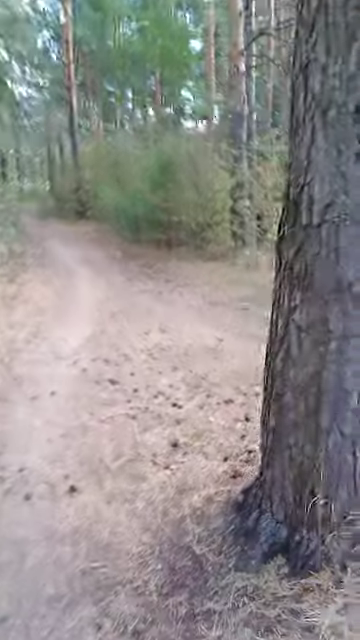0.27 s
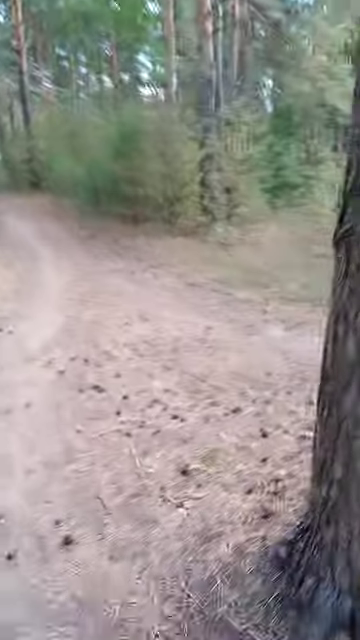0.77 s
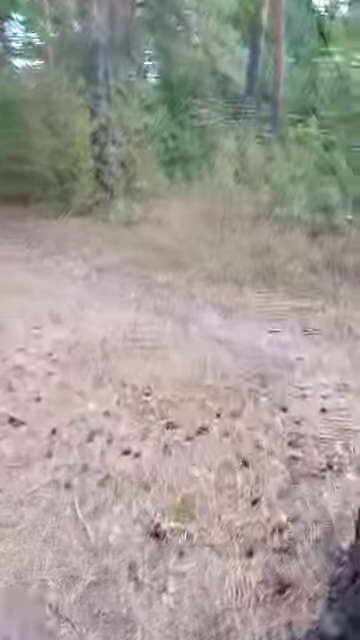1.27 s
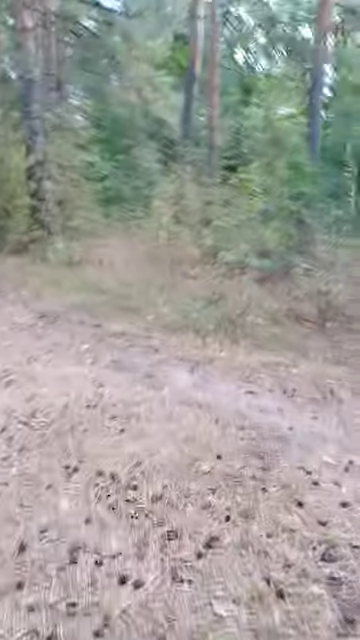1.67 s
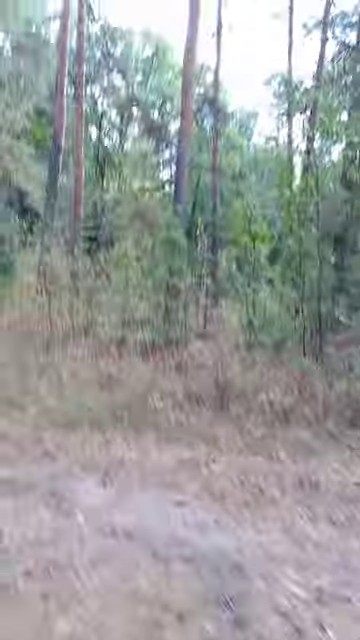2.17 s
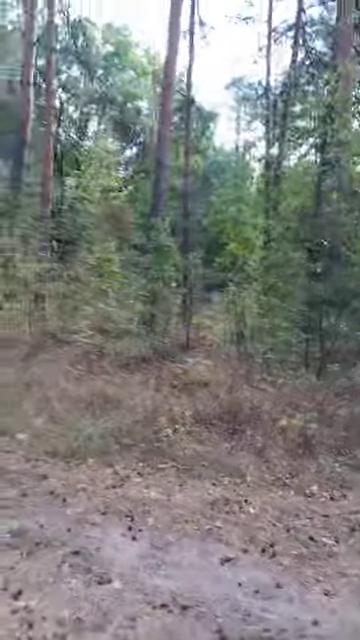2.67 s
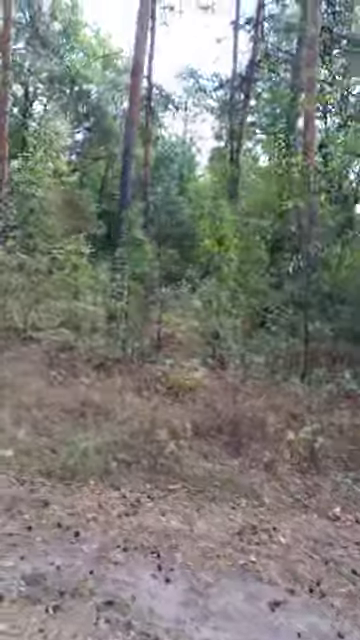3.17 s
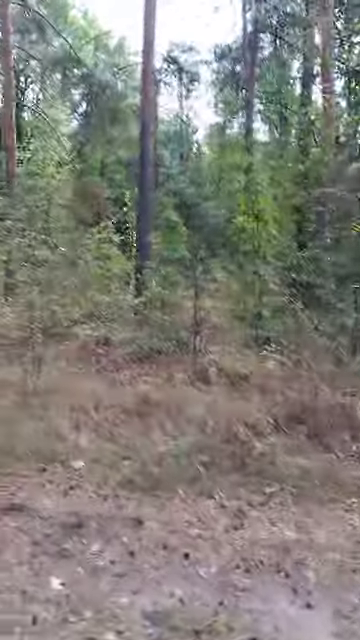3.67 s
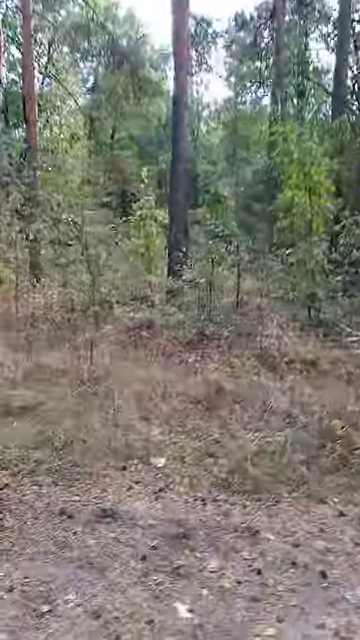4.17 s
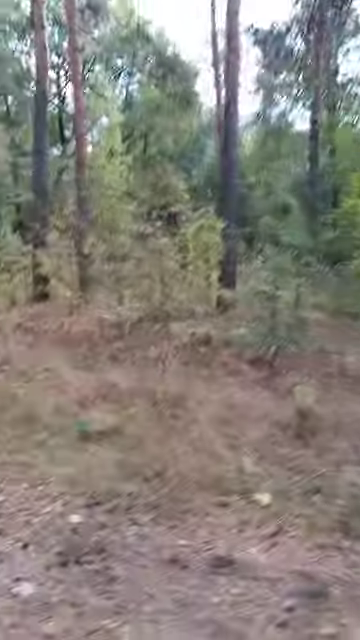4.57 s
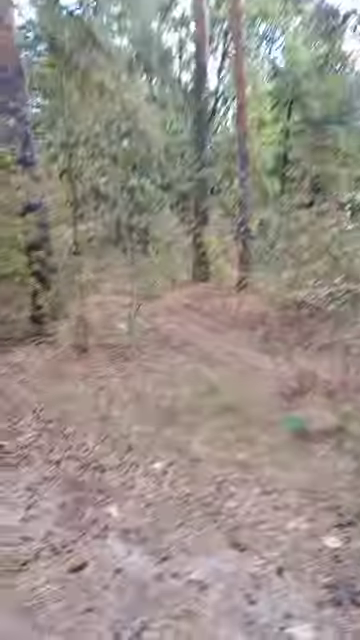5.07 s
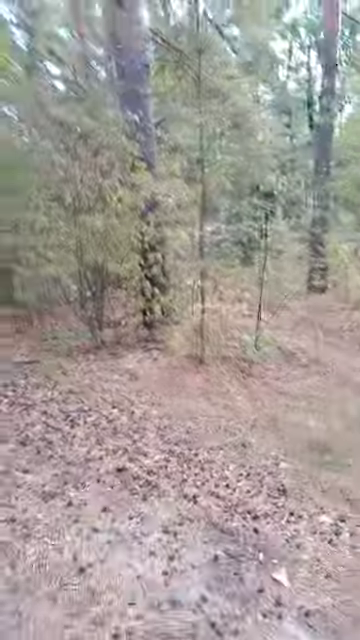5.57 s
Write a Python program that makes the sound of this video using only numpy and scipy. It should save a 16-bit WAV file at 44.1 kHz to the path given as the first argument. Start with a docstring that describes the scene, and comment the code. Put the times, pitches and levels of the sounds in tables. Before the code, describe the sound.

Faint tyre rustle on leaves and dirt under wind rumble, broken by loud finger pops and case knocks on the left of a handheld microphone.

```python
"""Something moves through leaf litter, as in footsteps or dragging: rustle, grind, a low hum and crunching twigs.
The microphone is a handheld stereo recorder with a left and a right port; wind rumbles in both.
A finger keeps touching the left port: sharp pops, knocks of the case and three sealed thumps.
Litter and crunches are grainy noise in third-octave bands, wind is low-passed noise; touches are pressure
pulses, with clicks that ring resonators, and seals are leaking pressure steps. A gate briefly cuts the rustle."""
import sys
import numpy as np
from scipy import signal
from scipy.io import wavfile
from scipy.ndimage import uniform_filter1d

SR = 44100
rng = np.random.default_rng(int(sys.argv[2]) if len(sys.argv) > 2 else 0)


def wav_record(signal):
    """Record a signal, one row per channel, as 16-bit PCM in the file named by sys.argv[1]."""
    frames = np.transpose(np.atleast_2d(signal))
    bounded = np.clip(frames, -1, 1)
    # unit amplitude maps onto the largest positive 16-bit level
    quanta = np.round(bounded * 32767).astype(np.int16)
    wavfile.write(sys.argv[1], SR, quanta)


def nominal_scale(level):
    """Amplitude ratio for a level in decibels (scalar or array-like)."""
    x = np.asarray(level, float) / 20
    return 10 ** x


N = 256662
RIGHT_LAG = 21   # samples by which shared sound reaches the right port after the left


def rms_one(x):
    """Scales to rms 1."""
    return x / np.sqrt(np.mean(x ** 2) + 1e-20)


def in_time(rows):
    """Interpolates each column of a curve, whose first column is seconds, to every sample."""
    seconds, *columns = np.transpose(rows)
    return [np.interp(np.arange(N) / SR, seconds, column) for column in columns]


def at_hz(points, hz):
    """Reads a curve over frequency on a log axis."""
    curve_hz, values = np.transpose(points)
    return np.interp(np.log(hz), np.log(curve_hz), values)


def drift(rate_hz):
    """Slow random wander of spread 1: noise through two equal poles, made at a fortieth of the sample rate."""
    pole = np.exp(-2 * np.pi * rate_hz * 40 / SR)
    noise = rng.standard_normal(N // 40 + 2002)
    slow = signal.lfilter([1], [1, -2 * pole, pole * pole], noise)[2000:]   # skip the filter's run-in
    return np.interp(np.arange(N) / 40, np.arange(len(slow)), rms_one(slow))


def band(x, low_hz, high_hz):
    """Butterworth band-pass."""
    return signal.sosfilt(signal.butter(2, [low_hz, high_hz], "band", fs=SR, output="sos"), x)


def low_pass(x, order, hz):
    """Butterworth low-pass."""
    return signal.sosfilt(signal.butter(order, hz, fs=SR, output="sos"), x)


def ring(clicks, hz, t60):
    """A two-pole resonator: a unit click starts a sine of height 1 that falls 60 dB in t60 seconds."""
    r, w = nominal_scale(-60 / (t60 * SR)), 2 * np.pi * hz / SR
    return signal.lfilter([0, np.sin(w)], [1, -2 * r * np.cos(w), r * r], clicks + 1e-18)


# How alike the litter sounds at the two ports. Each row: frequency in Hz, shared part of the power (0 to 1).
PORT_LIKENESS = [(100, 0.35), (350, .85), (1200, 0.49), (2600, 0.19), (4000, 0.043), (8600, 0.16),
                 (12000, .06)]
# How the litter leans to the left port. Each row: frequency in Hz, left level over right in dB.
LEFT_OVER_RIGHT = [(100, -11), (300, 1.5), (1300, 5.5), (4400, 5), (7800, 5.5), (9400, -5), (11000, -18),
                   (15000, 14.5)]


def litter(spectrum, grain_db, patchy_db):
    """Dense uneven grains in third-octave bands; the shared part reaches the right port late. Right rms 1."""
    lows = 125 * 2 ** (np.arange(21) / 3)
    highs = np.append(lows[1:], 16000)
    grains = nominal_scale(grain_db * np.minimum(rng.exponential(1, N), 5))
    white = rng.standard_normal((2, 3, N)) * uniform_filter1d(grains, size=14)
    out = 0
    for k, (low, high) in enumerate(zip(lows, highs)):
        both, left, right = band(white[k % 2], low, high)   # neighbouring bands use separate noise
        hz = np.sqrt(low * high)
        alike = np.clip(at_hz(PORT_LIKENESS, hz), 0, 1)
        shared = np.array([both, np.roll(both, RIGHT_LAG)])
        pair = np.sqrt(alike) * shared + np.sqrt(1 - alike) * np.array([left, right])
        gain = nominal_scale(at_hz(spectrum, hz) + patchy_db * drift(10.9))
        out = out + gain * pair * [[nominal_scale(at_hz(LEFT_OVER_RIGHT, hz))], [1]]
    return out / np.sqrt(np.mean(out[1] ** 2))


def hiss():
    """Faint steady noise, independent in the two channels."""
    return nominal_scale(-92) * band(rng.standard_normal((2, N)), 600, 8000)


# Wind at the ports. Each row: time in seconds, left level in dB, right level in dB, both before the gusts.
WIND_LEVELS = [(.4, -45.5, -48), (.7, -37.5, -49.5), (1.0, -39, -50.5), (1.25, -42.5, -32),
               (1.5, -45, -53.5), (1.9, -42, -39), (2.399, -38.5, -56), (2.8, -42, -43), (3.15, -46, -52),
               (3.35, -37, -38), (3.65, -44, -58), (3.95, -39, -41), (4.2, -47.5, -45), (4.5, -37, -41),
               (4.7, -40.5, -42.5), (5.0, -39.5, -41.5), (5.279, -42.5, -29.5), (5.55, -38, -48),
               (5.8, -44, -30.5)]


def wind():
    """Lumpy turbulence, its own in each port, falling steeply with pitch."""
    gust_db, gust_rate_hz = 4.5, 10
    pole = np.exp(-2 * np.pi * 4.96 / SR)
    lumps = signal.lfilter([1], [1, -pole], rng.standard_normal((2, N)))
    lumps = low_pass(band(lumps, 3.74, 230), 1, 70)
    ports = []
    for level_db, turbulence in zip(in_time(WIND_LEVELS), lumps):
        ports.append(nominal_scale(level_db + gust_db * drift(gust_rate_hz)) * rms_one(turbulence))
    return np.array(ports)


# A metal part is struck. Each row: start in seconds, pitch in Hz, starting height at the left port in dB,
# time to fall 60 dB in seconds.
METAL_PINGS = [(1.623, 3106, -38, .07), (1.623, 9448, -50, .05), (.497, 7000, -52, .025)]


def pings():
    """Short rings of a struck metal part, later and weaker at the right port."""
    left = np.zeros(N)
    for start, hz, level_db, t60 in METAL_PINGS:
        click = np.arange(N) == round(start * SR)
        left += ring(nominal_scale(level_db) * click, hz, t60)
    return np.array([left, nominal_scale(-4.0) * np.roll(left, RIGHT_LAG)])


# Modes of the recorder's case. Each row: pitch in Hz, gain in dB, time to fall 60 dB in seconds.
CASE_MODES = [(298, -21, 0.0033), (418, -2.3, 0.02), (587, -2, 0.016), (2210, -23, 0.0027)]
# Knocks on the case. Each row: start in seconds, left click in dB, right click in dB, both before the modes.
CASE_KNOCKS = [(.598, -42, -42), (0.649, -60, -53), (0.7529, -34.5, -37), (.7576, -24, -51),
               (0.7984, -25.5, -42), (1.9038, -20, -32), (2.256, -85, -42), (2.5549, -18.5, -31.5),
               (2.585, -35, -37), (2.634, -31.5, -34.5), (3.299, -39, -40), (3.4038, -24, -33.5),
               (3.684, -14, -47), (3.8182, -65, -39), (4.239, -39.5, -39), (4.2634, -30.5, -38),
               (4.437, -14, -40), (4.4619, -26, -52.5), (4.5703, -43.5, -33.5), (4.6962, -33, -42),
               (4.734, -29, -45)]


def knocks():
    """Each knock is a click that rings the modes of the case, heard in both ports."""
    clicks = np.zeros((2, N))
    for start, left_db, right_db in CASE_KNOCKS:
        at = round(start * SR)
        clicks[0, at] = -nominal_scale(left_db)
        clicks[1, at + RIGHT_LAG] = -nominal_scale(right_db)
    rings = sum(nominal_scale(db) * ring(clicks, hz, t60) for hz, db, t60 in CASE_MODES)
    return band(rings, 220, 3600)


# The finger seals or frees the left port. Each row: time in seconds, signed pressure step in units of
# full scale before the leak, leak frequency in Hz, rise time in ms.
PORT_SEALS = [(1.9043, -0.82, 3.9, 1.1), (2.5547, 1.1, 4.0, 0.7), (3.4039, 1.13, 3.5, 0.6)]


def seals(damping=0.83):
    """A pressure step in the left port leaks away and swings back once, as a second-order high-pass does."""
    left = np.zeros(N)
    turn = np.sqrt(1 - min(damping, .99) ** 2)
    for start, step, leak_hz, rise_ms in PORT_SEALS:
        t = np.arange(N) / SR - start
        rise = 1 / (1 + np.exp(-np.clip(t * 6000 / rise_ms, -30, 30)))
        phase = 2 * np.pi * leak_hz * np.maximum(t, 0)
        swing = np.cos(turn * phase) - damping / turn * np.sin(turn * phase)
        left += step * rise * np.exp(-damping * phase) * swing
    return np.array([left, np.zeros(N)])


# Resonances of the port cavity. Each row: pitch in Hz, bandwidth in Hz, gain in dB.
PORT_CAVITY = [(2106, 2360, 5.5), (3730, 1500, 3.5), (6240, 990, 0.5), (8160, 770, 3.5),
               (15300, 2600, -8.5)]
# Finger on the left port. Each row: start in seconds, suction in dB, suction width in ms, rebound in dB,
# strength of the dull crackle in dB, all before the filters.
FINGER_TOUCHES = [(.4419, -30, 0.094, -37.5, -48), (.538, -33, 0.3, -49, -38), (.648, -19, 0.085, -49, -22),
                  (0.7527, -33, 0.11, -43, -21), (0.7577, -2.5, 0.032, -48, -6),
                  (0.7989, -12.5, 0.079, -62, -5.5), (0.9453, -32, 0.32, -29, -60),
                  (1.9035, -26.5, 0.6, -20, -2), (2.2556, -27.5, 0.24, -28, -25),
                  (2.5542, -44.5, 0.25, -37, -7.5), (2.5857, -2.5, 0.28, -11.5, -5),
                  (3.403, -64, 0.17, -42.5, -15), (3.684, -5.5, 0.14, -10, -8.5),
                  (3.8174, -28, 0.2, -24, -21.5), (4.2349, -34, 0.089, -21.5, -38),
                  (4.2617, 9, 0.044, -16.5, -12), (4.438, 0.5, 0.071, -5.5, -5),
                  (4.4596, -3.5, 0.17, -9, -12), (4.5714, -2, 0.28, -9.5, -2),
                  (4.694, -5.5, 0.31, -21.5, -16.5), (4.732, -10, 0.41, -39, -31.5)]


def finger():
    """Skin peels off the left port: suction, rebound and slips that ring the port; a trace reaches the right."""
    sharp_db, sharp_slope = -4.5, 1.3   # dB at full strength, dB per dB: sharp slips grow faster than dull ones
    air, slips = np.zeros(N), np.zeros((2, N))   # slips: dull row, sharp row
    ms = np.arange(-100, 400) * 1000 / SR
    chance = rng.random((len(FINGER_TOUCHES), 8))
    for (start, suction_db, width, rebound_db, dull_db), draw in zip(FINGER_TOUCHES, chance):
        at = round(start * SR)
        suction = np.exp(np.where(ms < 0, ms / (1.01 * width), -(ms / width) ** 2))
        late = np.maximum(ms - width, 0) / (.35 + .9 * width)   # wider suction rebounds more slowly
        rebound = late * np.exp((1 - late ** 1.2) / 1.2)   # peaks at 1
        air[at - 100:at + 400] += nominal_scale(rebound_db) * rebound - nominal_scale(suction_db) * suction
        # four slips within a millisecond, the last one strongest
        when = at - (np.append(draw[:3], 0) * .0006 * SR).astype(int)
        weaker_db = 7.7 * np.append(draw[4:7] + 0.81, 0)
        for row, db in zip(slips, (dull_db, sharp_db + sharp_slope * dull_db)):
            np.add.at(row, when, -nominal_scale(db - weaker_db))
    dull, sharp = signal.lfilter([1, 1], [2], slips)   # skin is a soft striker
    crackle = np.zeros(N)
    for k, (hz, width_hz, db) in enumerate(PORT_CAVITY):
        strike = sharp if hz > 5000 else dull
        t60 = np.log(1000) / (np.pi * width_hz)
        crackle += nominal_scale(db) * (-1) ** k * ring(strike, hz, t60)
    crackle = band(crackle, 1700, 13000)
    left = crackle + low_pass(air, 2, 6000)
    right = nominal_scale(-40.0) * np.roll(band(crackle, 2000, 12000), RIGHT_LAG)
    return np.array([left, right])


# Spectrum of snapping twigs and cones. Each row: frequency in Hz, relative band level in dB.
SNAP_SPECTRUM = [(900, -5), (1700, -0.5), (2300, -2), (3000, -1.5), (4200, -11.5), (5600, -4), (7000, -13),
                 (8600, -9), (10500, -32), (16000, -43)]
# Spectrum of grinding dirt, also the dull part of a crunch. Each row: frequency in Hz, relative band level in dB.
GRIND_SPECTRUM = [(150, -45.5), (250, 5), (400, -1.5), (700, -7), (1200, -20.5), (2500, -30.5), (6000, -36)]
# Twigs and cones crushed. Each row: start in seconds, top of the bright swell in dB, length in ms (the top
# comes after a third of it), dull part in dB over the bright.
CRUSHES = [(1.4147, -58, 33, -23), (1.5238, -56.5, 22, 1.5), (1.62, -54, 36, 0), (2.3018, -49.5, 2.4, 7),
           (4.092, -51.5, 11, -9), (4.113, -54.5, 12, -17), (4.6037, -59, 36, 13.5), (4.865, -55, 37, 10.5),
           (4.8936, -56.5, 24, -14), (4.948, -45, 12.3, 3.5), (4.9776, -45.5, 14, -0.5),
           (4.9925, -47, 26, -13), (5.017, -52.5, 63, 1), (5.443, -52.5, 17, -14), (5.577, -51, 14, -13),
           (5.6034, -42.5, 21.8, 1), (5.6312, -43, 14, 3.5), (5.6478, -40.5, 6.4, 4.5),
           (5.6605, -41, 16.4, -19), (5.7234, -43.5, 10.4, 1), (5.7795, -53, 11.5, -4)]


def crunches():
    """Each crush is a quick swell of coarse grains, bright and dull, that then dies away."""
    bright, dull, t = np.zeros(N), np.zeros(N), np.arange(N) / SR
    for start, swell_db, length_ms, dull_db in CRUSHES:
        u = np.clip((t - start) * 1000 / length_ms * 3, 0, 30)
        swell = nominal_scale(swell_db) * u * np.exp(1 - u)
        bright += swell
        dull += swell * nominal_scale(dull_db)
    snaps = bright * litter(SNAP_SPECTRUM, grain_db=2.5, patchy_db=3.5)
    return snaps + dull * litter(GRIND_SPECTRUM, grain_db=3.0, patchy_db=0.5)


# Spectrum of leaf rustle. Each row: frequency in Hz, relative band level in dB.
RUSTLE_SPECTRUM = [(700, -0.5), (1400, -2), (2900, 1), (4100, -3.5), (6400, -3.5), (8200, -5.5),
                   (9400, 3.5), (10900, -10), (15100, -11.5), (16000, -21)]
# Leaf rustle. Each row: time in seconds, level in dB before the clumps.
RUSTLE_LEVELS = [(.4, -78.5), (.6, -55.5), (.9, -68.5), (1.2, -56.5), (1.38, -65), (1.55, -57.5),
                 (1.9, -62), (2.07, -66), (2.3, -55.5), (2.52, -71), (2.7, -56), (2.8, -69), (2.95, -60.5),
                 (3.22, -69.5), (3.58, -63.5), (3.72, -68), (3.82, -64), (4.1, -59), (4.2, -64.5),
                 (4.32, -59), (4.5, -58), (4.65, -64.5), (4.82, -58), (5.1, -59), (5.35, -62.5),
                 (5.55, -55.5), (5.8, -59.5)]
# A noise gate cuts the rustle. Each row: start in seconds, length in seconds.
GATE_CUTS = [(0.826, 0.059), (0.91, 0.041), (1.315, 0.04), (1.985, 0.024), (2.036, 0.041), (2.419, 0.062),
             (2.481, 0.08), (2.724, 0.054), (2.784, .03), (3.029, 0.066), (3.099, 0.068), (3.202, 0.038),
             (3.283, 0.027), (3.324, 0.021), (3.408, .021), (3.48, 0.058), (3.545, 0.06), (3.657, 0.013),
             (3.705, 0.042), (3.85, 0.034), (4.162, 0.031), (4.657, 0.04), (5.263, 0.058), (5.311, 0.061)]
# Low sound of the ground. Each row: time in seconds, dirt grind in dB, hum in dB, both before their wander.
GROUND_LEVELS = [(.4, -71.5, -80), (.6, -65.5, -63), (.85, -69, -66), (1.05, -65.5, -62.5),
                 (1.35, -64.5, -63), (1.65, -63.5, -59.5), (2.0, -65.5, -57.5), (2.3, -65, -56),
                 (2.7, -65.5, -55), (2.95, -65.5, -62), (3.3, -68.5, -55.5), (3.75, -64.5, -56),
                 (4.2, -60.5, -57), (4.5, -56, -61), (4.62, -71, -59), (4.8, -58, -69), (5.0, -50, -50),
                 (5.27, -62, -71.5), (5.55, -57.5, -49.5), (5.8, -60, -51.5)]


def ground():
    """Leaves rustle in clumps, briefly cut by a noise gate; dirt grinds and a low hum lies below."""
    cut_db, return_db_per_s = -89.5, 234   # each cut starts at this level and creeps up until it ends
    (rustle_db,), (grind_db, hum_db) = in_time(RUSTLE_LEVELS), in_time(GROUND_LEVELS)
    for start, length in GATE_CUTS:
        back_db = cut_db + return_db_per_s * np.arange(round(length * SR)) / SR
        rustle_db[round(start * SR):][:len(back_db)] = back_db
    clumps = nominal_scale(2.7 * drift(26) + 0.43 * drift(90))
    rustle = uniform_filter1d(nominal_scale(rustle_db), size=300) * clumps
    leaves = rustle * litter(RUSTLE_SPECTRUM, grain_db=3.0, patchy_db=1.0)
    lumps_db = 2.5 * drift(25)
    dirt = nominal_scale(grind_db + lumps_db) * litter(GRIND_SPECTRUM, grain_db=5.5, patchy_db=3.0)
    hum = rms_one(band(rng.standard_normal(N), 114.3, 182))
    return leaves + dirt + nominal_scale(hum_db + 1.2 * drift(1.7)) * hum


def scene():
    """All sources at the two ports; sound from the forest floor is weakened above about 10 kHz."""
    forest_floor = ground() + crunches()
    top = signal.sosfilt(signal.cheby1(6, 1, 10300, "high", fs=SR, output="sos"), forest_floor)
    body = signal.sosfilt(signal.cheby1(6, 1, 9900, fs=SR, output="sos"), forest_floor)
    forest_floor = body + nominal_scale(-6.5) * top
    return forest_floor + wind() + finger() + knocks() + seals() + pings() + hiss()


def top_cut(x):
    """Nothing passes above the cut-off."""
    return signal.sosfilt(signal.butter(12, 16560, fs=SR, output="sos"), x)


def record(dry):
    """The input opens in 10 ms steps while an offset settles; overload is cut flat, the top is cut off."""
    start_s, step_s = .38, .01
    t = np.arange(N) / SR - start_s
    offset = 0.026 * np.exp(-(np.maximum(t, 0) / 0.095) ** 2) * nominal_scale([[0], [-2.5]])
    opening = np.clip((np.floor(t / step_s) + 1) / 6.5, 0, 1)
    mix = np.clip((dry + offset) * opening, -.975, .975)
    mix = signal.sosfilt(signal.cheby2(14, 50, 17000, fs=SR, output="sos"), mix)
    return top_cut(mix)


dry = scene()
out = record(dry)
wav_record(out)
```